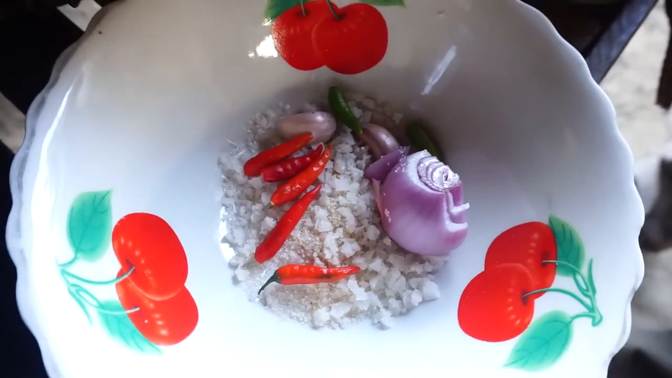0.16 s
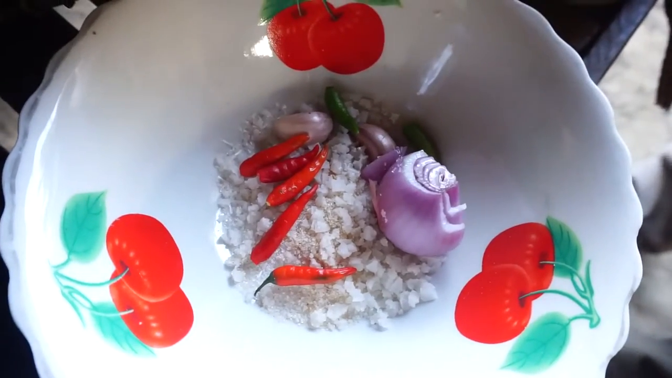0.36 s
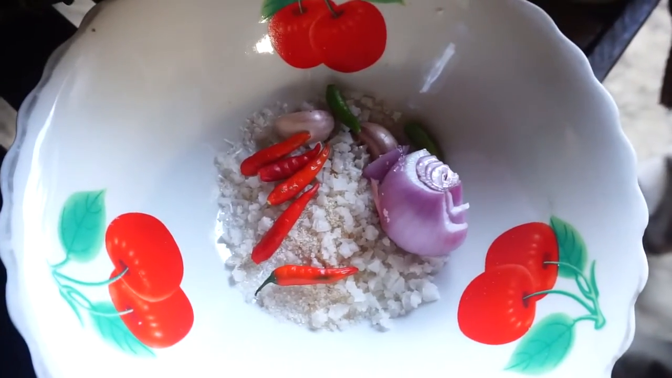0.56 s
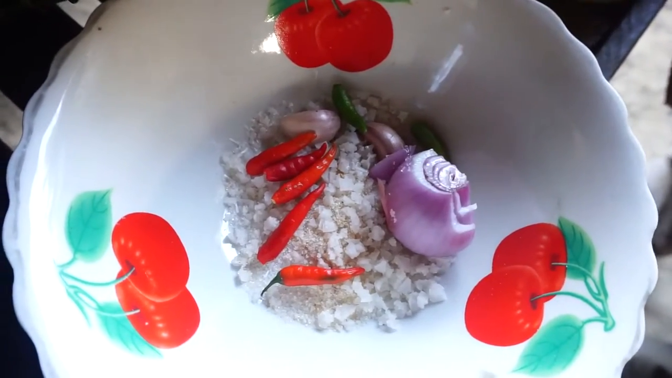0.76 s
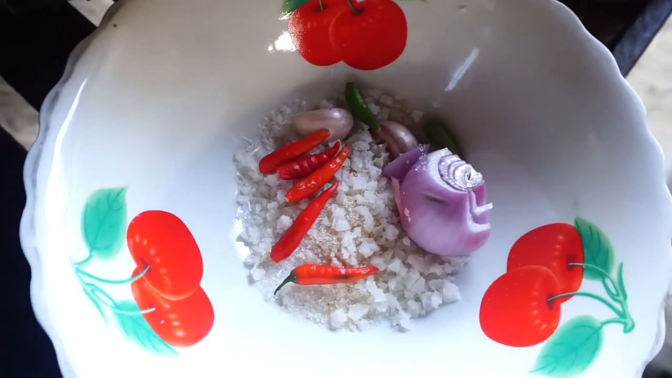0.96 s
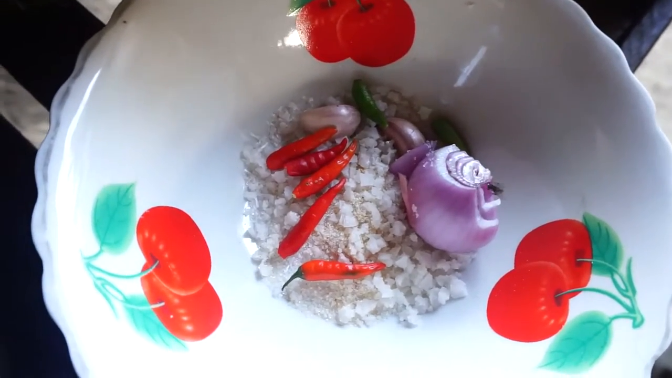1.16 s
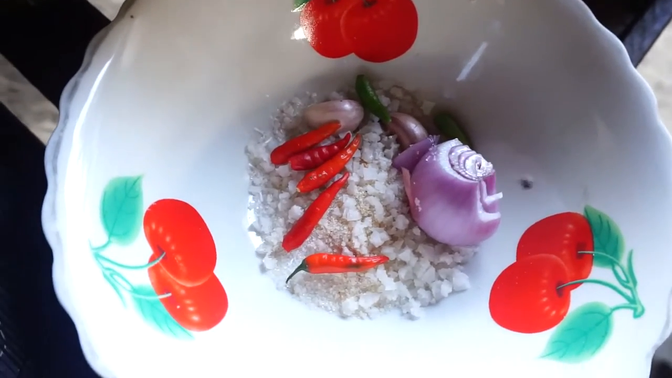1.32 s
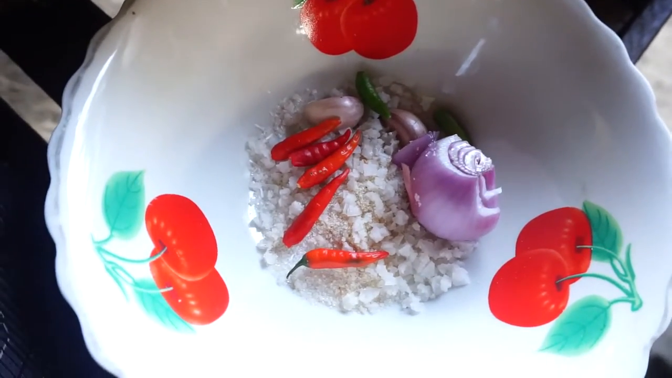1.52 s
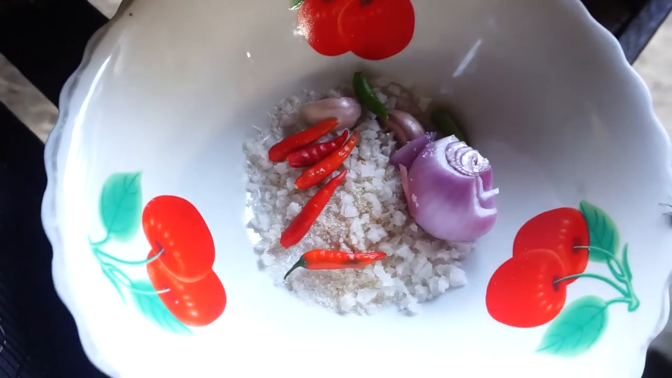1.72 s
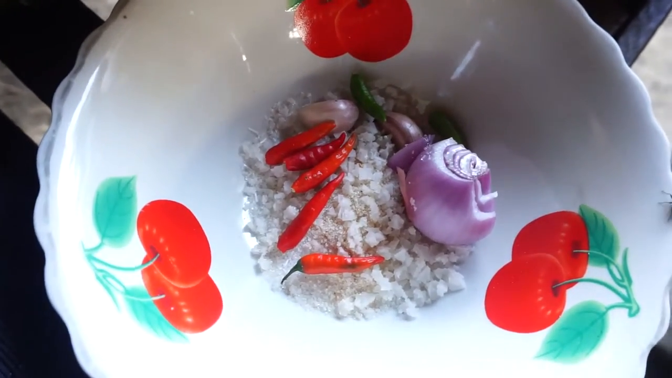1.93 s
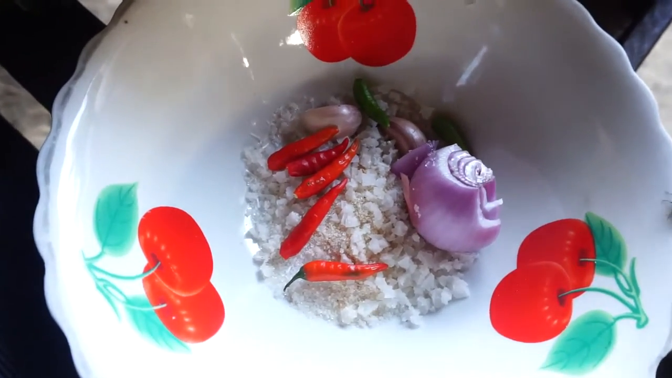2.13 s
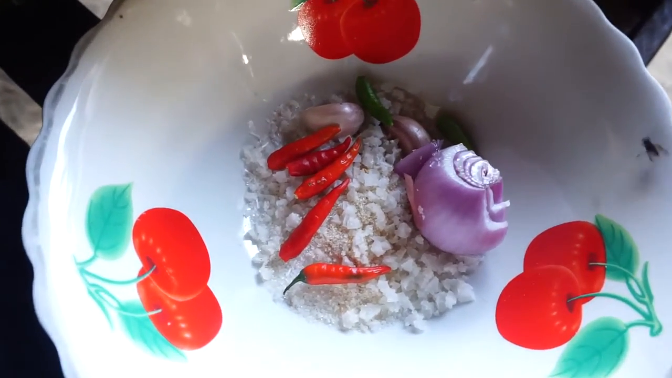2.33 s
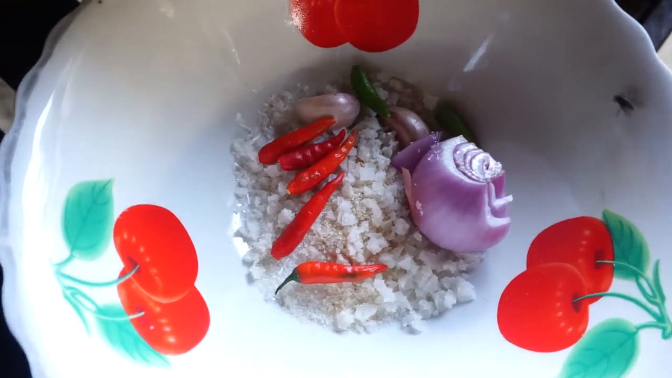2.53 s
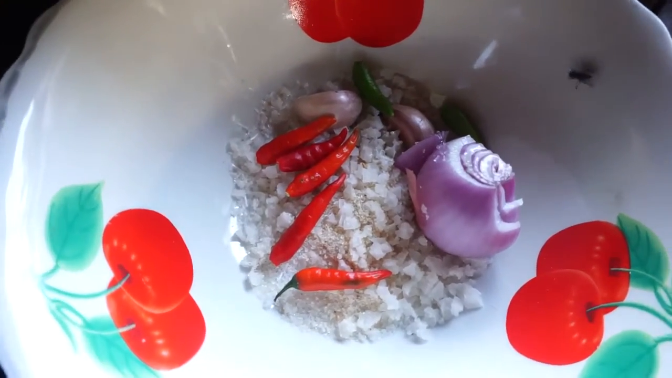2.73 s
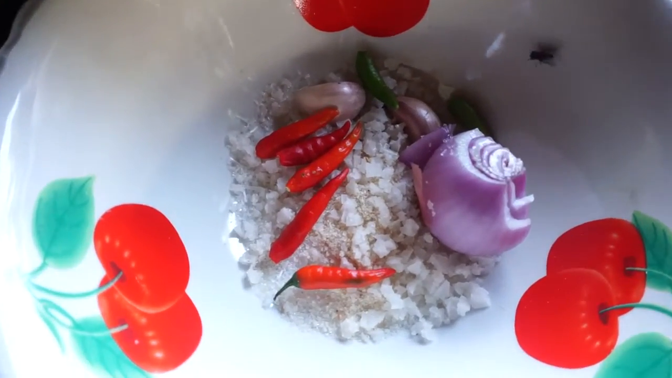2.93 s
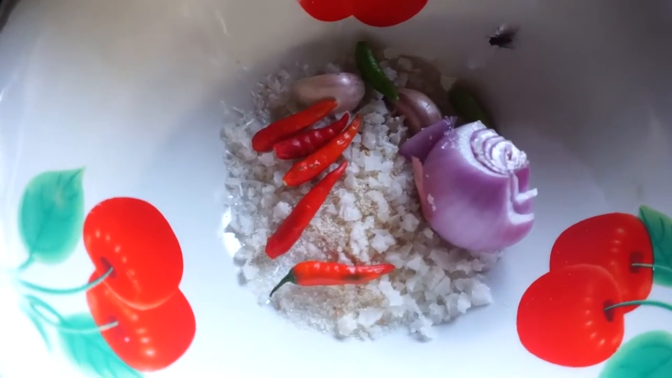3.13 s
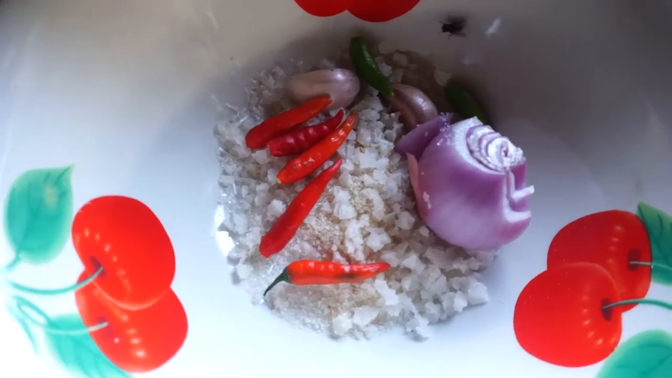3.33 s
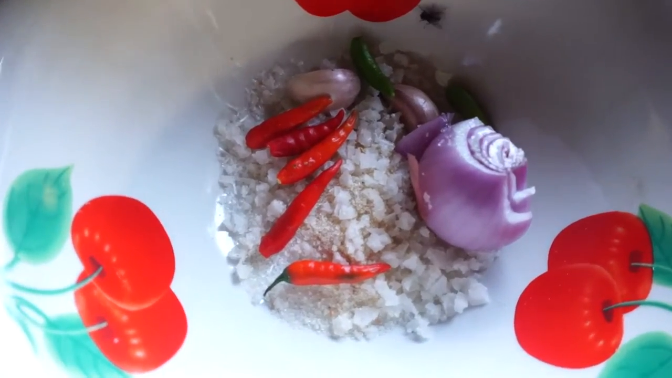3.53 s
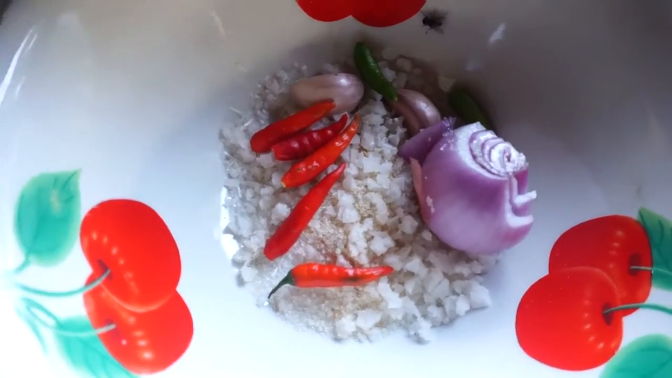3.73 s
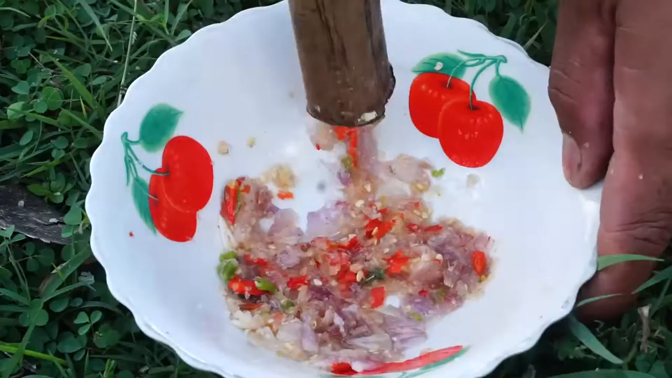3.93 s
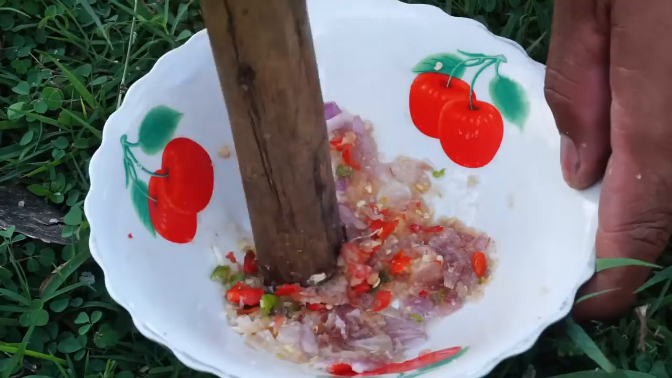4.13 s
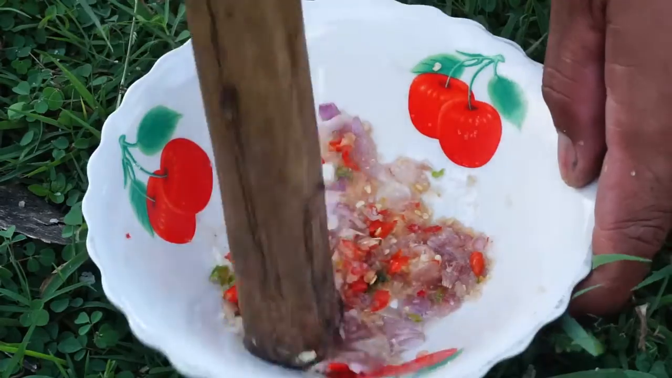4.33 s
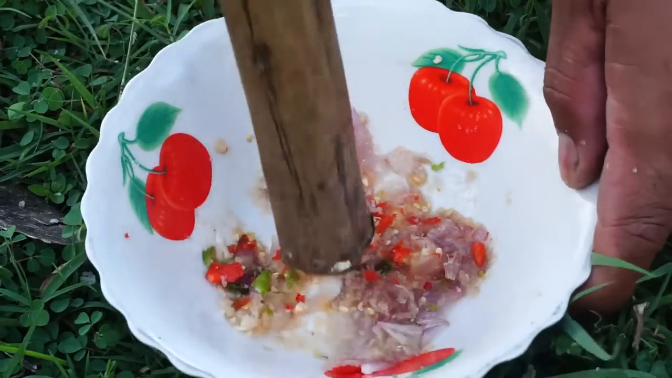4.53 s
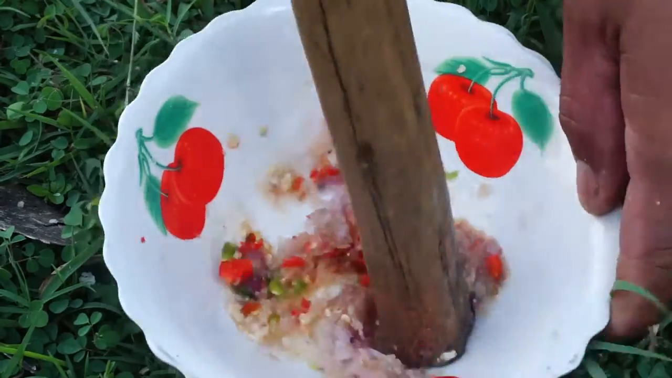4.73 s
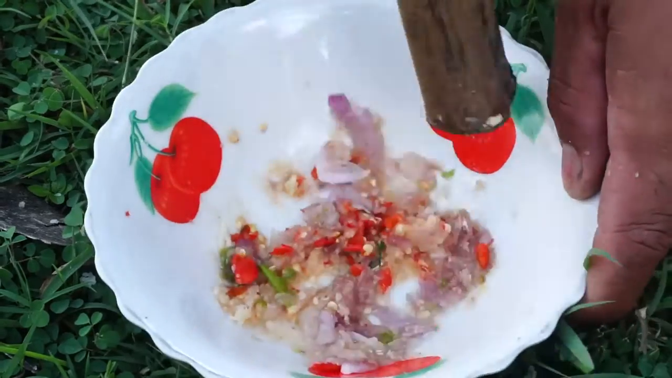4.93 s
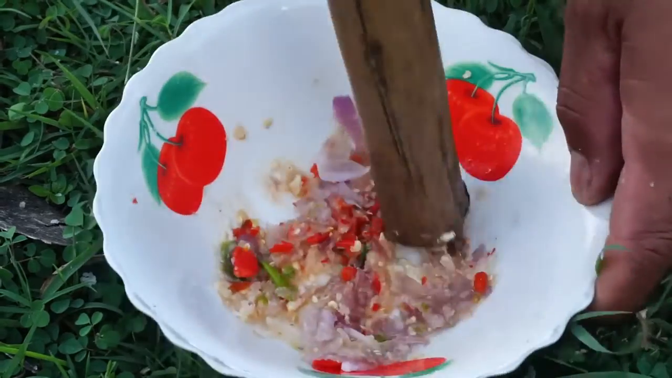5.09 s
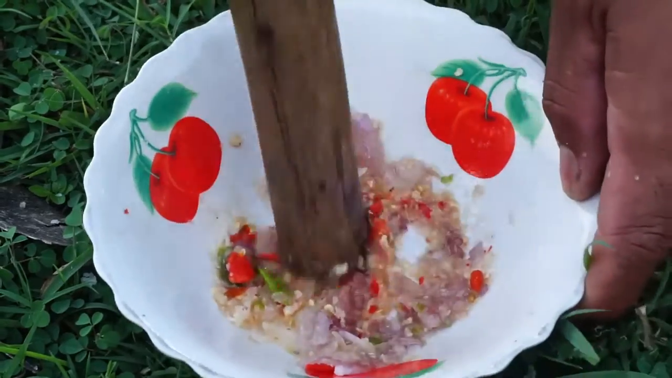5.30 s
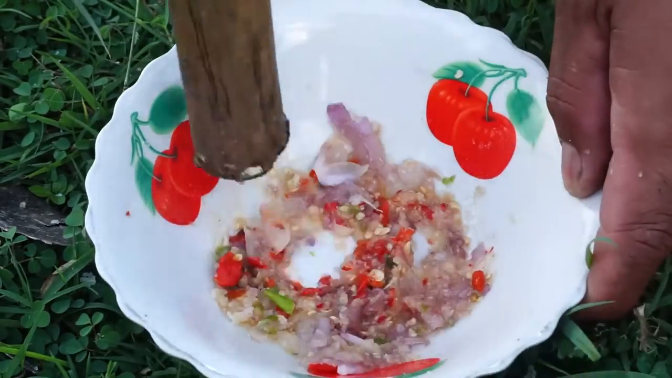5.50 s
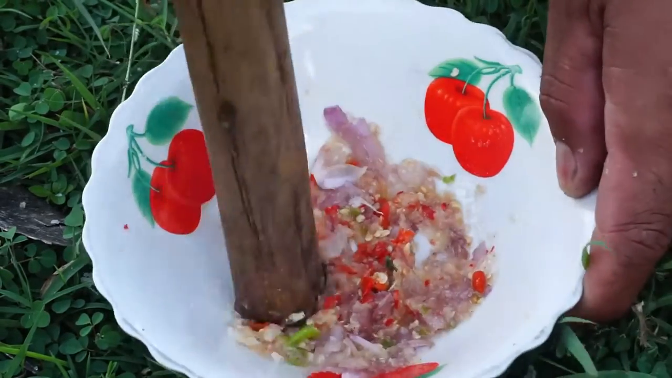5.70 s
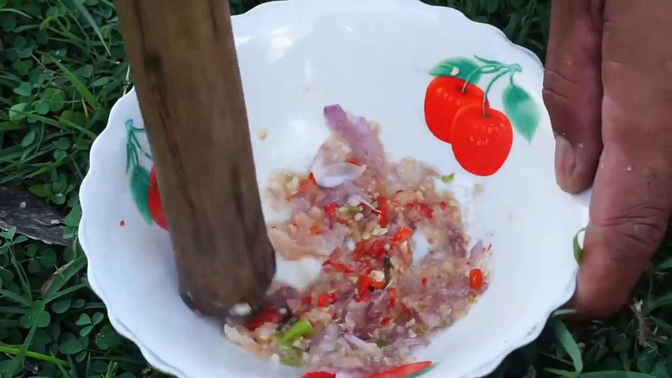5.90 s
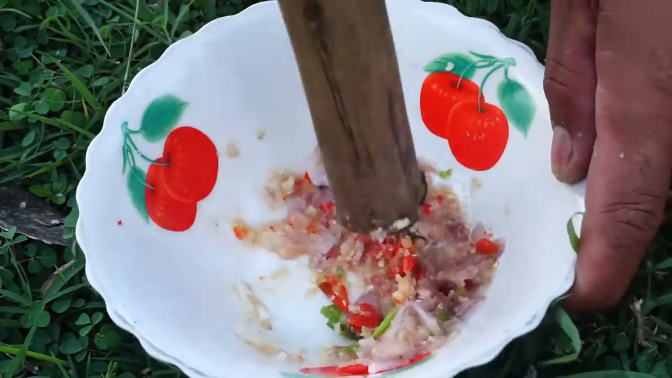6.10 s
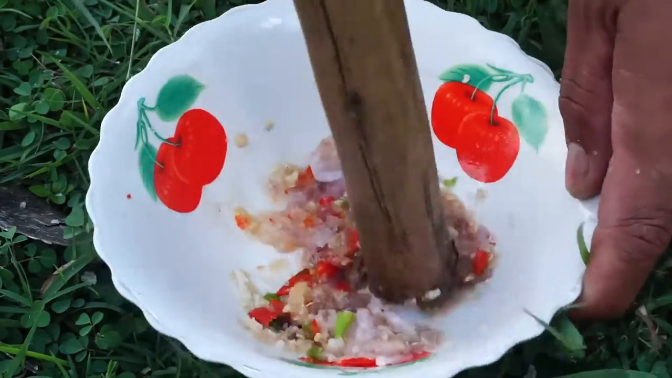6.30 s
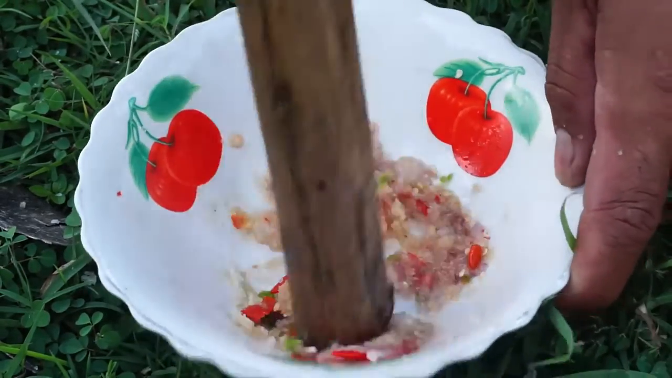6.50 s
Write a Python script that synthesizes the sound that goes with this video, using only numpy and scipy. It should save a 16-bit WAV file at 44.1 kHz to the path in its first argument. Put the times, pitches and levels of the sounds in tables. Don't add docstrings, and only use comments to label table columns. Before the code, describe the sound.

From 0 to 4 seconds a quiet yard is heard: soft low wind, thin leaf hiss and small cloth-like rustles, clearest around 1.3 seconds. A far bird gives very short, high gliding chirps from 0.5 seconds, with faint echoes off the surroundings. A weak fly buzz swells between 0.7 and 1.4 seconds and fades by 2. Tiny dry ticks are scattered throughout, with a bright metal clink at 1.5. Around 4.0 the sound drops almost to silence, then a lawn with barely audible crickets fades in. From 4.15 a wooden pestle pounds wet vegetables close by, roughly every 0.3 seconds, at about 4.15, 4.46, 4.8, 5.1, 5.4, 5.7, 6.0 and 6.3. Each much louder blow combines crisp pulp crunch, sharp seed snaps, short hollow bowl knocks and usually a low turf thump, heaviest near 5.4, followed by a soft crackling squelch on the lift.

```python
import sys
import numpy as np
from scipy import signal
from scipy.fft import rfft, irfft, next_fast_len
from scipy.io import wavfile
from scipy.ndimage import uniform_filter1d

SR = 44100
rng = np.random.default_rng(int(sys.argv[2]) if len(sys.argv) > 2 else 0)


def store_wav(level_fs):
    pcm = np.round(np.clip(np.atleast_2d(level_fs), -1, 1) * 32767)
    wavfile.write(sys.argv[1], SR, pcm.T.astype(np.int16))


def decibels_to_gain(level_db):
    exponent = np.asarray(level_db, float) / 20
    return 10 ** exponent


N = 288855
T = np.arange(N) / SR

# frequency in Hz, level in dB per Hz.
YARD_SPECTRUM = [(12, -34), (20, -15.5), (53, -2.5), (111, -10), (139, -11), (323, -15), (492, -15),
                 (839, -20), (1280, -22), (1790, -22), (2010, -23), (5830, -29), (14700, -31), (16500, -34)]
# frequency in Hz, level in dB per Hz.
LAWN_SPECTRUM = [(12, -26), (20, 2), (71, -8), (465, -20.5), (913, -23), (1280, -26.5), (1650, -26.5),
                 (2120, -28), (2310, -28.5), (3830, -31.5), (9670, -33.5), (11500, -27.5), (15200, -35),
                 (16500, -49)]
# frequency in Hz, left-right correlation.
LIKENESS = [(60, 1), (130, 0.74), (290, 0.0076), (640, -0.33), (1410, -0.28), (3100, -0.28), (6820, -0.093),
            (15000, 0.092)]
# time in seconds, level in dB.
YARD_STIR = [(0.0, -62.5), (0.56, -62.5), (0.9, -61), (1.06, -61), (1.32, -62), (1.47, -60.5), (1.62, -62),
             (2.36, -63), (3.0, -63), (3.65, -62), (3.83, -60.5), (3.94, -60.5)]
# time in seconds, level in dB.
LAWN_STIR = [(4.05, -66), (4.17, -62.5), (4.3, -66), (4.36, -65), (6.11, -65.5), (6.55, -65)]
AIR_HZ = (100, 1800, 8000, 13000)
STIR_SHARE = (0.02, 1.17, 2, 2)
# time in seconds, length in seconds, level in dB.
GUSTS = [
    (.53, .12, 4),
    (3.2, .25, 5),
    (3.95, .1, 3),
    (5.25, .12, 3),
]
# time in seconds, level in dB.
FADE = [
    (3.983, 0),
    (3.99, -20),
    (3.999, -42),
    (4.018, -46),
    (4.027, -21),
    (4.043, -8),
    (4.13, -4),
    (4.2, 0),
]
# centre in seconds, length in seconds, centre in Hz, level in dB.
RUSTLES = [(.25, .25, 13800, -63), (.8, 0.16, 1460, -66), (1.01, .2, 12000, -65), (1.33, 0.15, 12000, -58),
           (1.405, 0.4, 2900, -67), (1.4, .2, 1400, -68), (1.46, 0.29, 7940, -66),
           (1.867, 0.11, 6760, -62.5), (2.087, 0.3, 6100, -65.5), (2.39, 0.1, 2180, -64),
           (2.753, 0.23, 2000, -80), (3.775, 0.12, 13000, -61), (3.84, 0.065, 2200, -78),
           (3.957, 0.063, 2530, -63)]
# time in seconds, wing-beat octave in Hz, level in dB.
FLY = [
    (.45, 500, -88),
    (.7, 535, -71),
    (.9, 490, -71),
    (1.1, 545, -71),
    (1.4, 580, -73),
    (1.75, 570, -81),
    (2.0, 560, -95),
]
# start in seconds, last pitch in Hz, peak in dB.
RISING = [(0.652, 5900, -52.5), (0.981, 5920, -50), (1.851, 5900, -55.5), (2.069, 6010, -52),
          (2.411, 5840, -61.5), (2.782, 5840, -61), (3.3, 5850, -65), (3.797, 5830, -55),
          (3.955, 5840, -53.5)]
# start in seconds, first pitch in Hz, last pitch in Hz, length in ms, peak in dB.
SLIDING = [(.459, 5800, 5350, 15, -56), (.471, 5350, 4300, 13, -65), (.481, 4300, 3900, 26, -61),
           (.613, 4300, 4100, 14, -62), (.807, 5750, 5150, 16, -53), (.825, 4400, 3900, 20, -59),
           (1.116, 4350, 3150, 19, -56), (2.581, 6450, 6150, 16, -59), (2.4, 4300, 5300, 18, -66),
           (2.763, 4200, 5300, 24, -62), (3.757, 6200, 7100, 30, -63), (3.79, 4300, 5000, 12, -60),
           (3.925, 6300, 7300, 16, -62)]
# start in seconds, first pitch in Hz, last pitch in Hz, length in ms, peak in dB.
LAWN_NOTE = (4.035, 6700, 7150, 20, -66)
# start in seconds, peak in dB, centre in Hz, left minus right in dB.
TICKS = [(1.279, -50, 11800, -16), (1.3495, -39, 12600, -40.5), (1.3509, -69, 7050, -26),
         (1.513, -27.5, 11600, -14), (1.5134, -41, 4300, -12), (1.6, -45, 6510, -6),
         (1.6589, -34.5, 11700, -12), (1.729, -51, 2100, -2), (1.794, -49, 2000, -2),
         (1.979, -49, 2100, -2), (1.994, -52, 2050, -2), (2.018, -47, 1950, -2), (2.162, -52, 2050, 0.5),
         (2.281, -49.5, 2000, -2), (2.3425, -47, 1500, -2.5), (2.385, -45.5, 2520, 1),
         (2.401, -50, 2200, -2), (2.465, -48.5, 2200, -1), (2.528, -46, 10500, -6.5),
         (2.671, -48, 1900, -6), (2.62, -54, 7000, -6), (2.738, -48, 10400, -13), (2.803, -48.5, 1900, -3),
         (2.866, -54, 2000, -2), (3.1557, -57, 11700, 0.5), (3.329, -47.5, 9900, -12),
         (3.5937, -43, 2400, -11.5), (3.5933, -46, 4600, -12.5), (3.5935, -46, 10500, -10),
         (3.5945, -45, 3100, -8), (3.7, -51, 7500, -8), (3.63, -55, 12500, -8), (3.555, -55, 4500, -4),
         (3.7, -49, 11000, -9), (3.836, -44, 2070, -7), (3.9385, -43, 2400, -5), (3.9601, -34.5, 2500, -13),
         (3.9718, -38, 2400, 1), (3.98, -40, 1190, -6)]
# frequency in Hz, t60 in seconds.
METAL_MODES = [(11655, .14), (13482, .19), (6584, .22), (9604, .05)]
# start in seconds, peak of each of the four modes in dB, free ringing in seconds.
CLINKS = [
    (1.349, -60, -54, -44, -47, .004),
    (1.5138, -28, -32, -55, -56, .036),
    (1.6585, -51, -66, -75, -64, .012),
    (3.156, -54, -75, -80, -80, .06),
]
# time in seconds, left minus right in dB.
SPOT = [(4.15, -2), (4.456, -5), (4.476, 1), (4.53, -4.5), (4.8, -4), (5.13, -4.5), (5.42, -2), (5.72, -2),
        (6.02, -1.5), (6.32, -4.5)]
# start in seconds, peak in dB, frequency in Hz, squelch level in dB.
THUMPS = [
    (4.173, -23, 120, -46),
    (4.467, -40, 119, -43),
    (4.786, -48, 136, -68),
    (4.812, -25.5, 109, -42.5),
    (5.125, -23.5, 130, -44),
    (5.43, -17.5, 116.4, -47.5),
    (5.732, -21.5, 103, -44.5),
    (6.028, -23.5, 101, -40),
    (6.343, -23, 113, -43),
]
# start in seconds, peak in dB, lower mode in Hz, upper mode in Hz,
# upper minus lower in dB.
KNOCKS = [(4.1462, -25, 583, 980, 5), (4.151, -31.5, 567, 900, 1), (4.164, -36, 890, 960, 7),
          (4.1675, -27.5, 670, 1120, 14), (4.4568, -20, 678, 1093, 5), (4.476, -23.5, 620, 1026, 6.5),
          (4.7831, -16, 724, 860, -1.5), (4.7866, -19.5, 754, 870, -3), (4.7918, -31, 650, 910, -2),
          (4.804, -36, 700, 880, -3), (5.109, -36, 660, 1090, 21), (5.1153, -16.5, 636, 1023, 5.5),
          (5.417, -41, 526, 1100, 16), (5.4268, -18.5, 660, 800, -6), (5.707, -38, 804, 986, 16),
          (5.725, -28.5, 902, 990, -4), (5.729, -25, 868, 1077, 8.5), (5.994, -44, 816, 850, 0),
          (6.002, -42, 590, 930, 7), (6.017, -34, 880, 1145, 11), (6.022, -37, 860, 910, 15),
          (6.049, -48, 750, 1020, 10), (6.3122, -30, 570, 1000, 10.5), (6.3365, -18, 870, 1063, 6),
          (6.34, -30, 780, 1120, 3)]
# ratio to the lower mode, level in dB, share of t60.
LOWER = [(0.98, 0.5, 0.75), (1.153, -10, 1.1), (0.79, -1.5, 0.48), (0.423, -14.5, 1.13)]
# ratio to the upper mode, level in dB, share of t60.
UPPER = [(1.023, -3.5, 0.73), (1.24, -16, 0.16), (2.15, -16.5, 0.56), (1.43, -22, 0.4)]
# start in seconds, frequency in Hz, peak in
# dB, t60 in seconds.
PINGS = [(4.4568, 14200, -18.5, 0.033), (4.4576, 5900, -48, 0.034), (4.4568, 7900, -59, 0.043),
         (4.4568, 4260, -47, 0.038), (4.478, 9600, -34, 0.025), (4.478, 3800, -29.5, 0.017),
         (4.475, 5600, -30, 0.021), (4.7835, 14200, -40, 0.034), (4.807, 9670, -28, 0.044),
         (5.117, 9700, -34, 0.054), (5.425, 9280, -24.5, 0.014), (5.706, 12200, -19, 0.027),
         (5.706, 9900, -22, 0.025), (5.706, 14260, -28, .02), (5.73, 9500, -40, 0.017),
         (5.993, 9900, -39, 0.083), (6.019, 9900, -34, .016), (6.02, 4350, -26, 0.014),
         (6.312, 10350, -35, 0.018), (4.4577, 650, -19, .042), (4.48, 660, -33, .035),
         (6.34, 210, -34, .03), (5.426, 1800, -28, .012), (4.7838, 250, -25, .025),
         (4.808, 1750, -32, .025), (4.464, 680, -27, .05), (4.4775, 1750, -32, .02), (4.807, 380, -33, .02),
         (6.338, 330, -31, .03), (5.4255, 5300, -28, .012), (4.1475, 1400, -30, .012),
         (4.8075, 2350, -36, .02), (4.803, 8500, -28, .015), (4.4572, 1650, -25, .018),
         (4.784, 400, -27, .02), (5.426, 2350, -29, .015), (5.728, 680, -30, .025), (5.72, 1700, -34, .02),
         (4.1695, 700, -31, .03), (5.138, 480, -36, .02), (6.337, 1500, -33, .015),
         (4.458, 1935, -24.5, 0.023), (4.785, 1880, -30.5, 0.024), (5.427, 2080, -26.5, 0.0082)]
# start in seconds, peak in dB, centre in Hz.
SNAPS = [(4.1467, -24, 11500), (4.1605, -22, 10500), (4.219, -42, 9000), (4.4572, -22, 12500),
         (4.4773, -30, 13000), (4.5306, -25, 7950), (4.8028, -17.5, 13000), (4.8245, -45, 12000),
         (4.8318, -36, 9000), (4.8347, -30, 8000), (4.9705, -46, 9000), (5.1368, -21, 11000),
         (5.151, -40, 10500), (5.1622, -32, 11500), (5.1667, -25, 8000), (5.426, -20, 10500),
         (5.4905, -50, 9000), (5.5135, -43, 9000), (5.536, -53, 9000), (5.7068, -19, 11500),
         (5.7223, -23, 12500), (5.7287, -21, 12000), (5.7538, -38, 10500), (5.774, -48, 9000),
         (5.7985, -43, 9000), (6.0505, -18, 10000), (6.3125, -28, 10500), (6.333, -20.5, 12000),
         (6.367, -40, 12000)]
# start in seconds, level in dB, hold in ms, dull part under 5 kHz in dB.
CRUNCHES = [(4.145, -44, 2, 3), (4.147, -39, 1.5, 2), (4.151, -48, 6.7, 6), (4.1597, -26, 5.7, -8),
            (4.1675, -29.5, 2, 2.5), (4.17, -34, 2.5, 2.5), (4.456, -36, .7, 6), (4.4655, -39, 3.6, 5),
            (4.47, -35.5, 5.3, 4.5), (4.477, -30, 1, -3), (4.478, -33, 1.6, 3.5), (4.7835, -40, 1.8, 8),
            (4.793, -52, 5, 2), (4.799, -43, 3, -1), (4.804, -26.5, 3.5, -1.5), (4.8073, -28.5, 3.6, 1.5),
            (5.103, -43, 2, -3), (5.1074, -25, 3.9, -7), (5.111, -35.5, 2.7, 5.5), (5.1157, -31.5, 2, 0),
            (5.119, -39, 6.9, 3), (5.137, -33, 2.3, 1), (5.4105, -39.5, 3.5, -2), (5.416, -35, 5.7, 0),
            (5.4247, -25.5, 1.7, -0.5), (5.427, -33.5, 1.3, 2), (5.7058, -22.5, 2.5, -7.5),
            (5.711, -29, 3, -4), (5.718, -32, 2, -1), (5.7206, -24, 2, -4.5), (5.724, -30, 4, 1.5),
            (5.7295, -29, 4.4, 2), (5.752, -42.5, 3, 3), (5.9935, -38.5, 1.8, -0.5), (5.997, -44, 6, 4),
            (6.003, -36.5, 2.3, 2), (6.009, -43, 6, 2), (6.015, -32, 2, -2), (6.0187, -19, 2.6, -5.5),
            (6.023, -25, 2.8, -3), (6.028, -40, 9.5, -2.5), (6.04, -39, 10, 0), (6.052, -38, 5, -1.5),
            (6.311, -31, 3, 1.5), (6.315, -42, 4, 5), (6.321, -45, 7, 5), (6.329, -38, 2.5, 1),
            (6.3315, -33, 3.5, -3), (6.337, -30, 1.6, 1.5), (6.3393, -36.5, 5.7, 4.5)]
# frequency in Hz, level in dB per Hz.
PULP_SPECTRUM = [(410, -8), (700, -6.5), (2410, -9), (3150, -10.5), (5720, -8), (7370, -9.5), (9870, -3.5),
                 (11300, -2), (12200, -3.5), (15900, -3), (16800, -49)]
# frequency in Hz, width in Hz, level in dB.
RIM_MODES = [(3800, 120, -3), (5660, 410, -17), (8350, 140, -44), (9700, 79, -10), (10500, 150, -24),
             (12200, 150, -19), (14260, 88, -15)]


def curve(table, at_hz):
    hz, value = np.transpose(table)
    return np.interp(np.log(np.maximum(at_hz, 1)), np.log(hz), value)


def shape(x, gain):
    size = next_fast_len(N)
    f = np.arange(size // 2 + 1) * SR / size
    return irfft(rfft(x, size) * gain(f), size)[..., :N]


def resonate(x, hz, q):
    return signal.lfilter(*signal.iirpeak(hz, q, SR), x)


def bell(centre, width):
    return lambda f: np.exp(-.5 * ((f - centre) / width) ** 2)


def low_cut(f, hz):
    return 1 / (1 + (hz / (f + 1)) ** 4)


def unit(x):
    return x / np.sqrt(np.mean(x ** 2))


def walk(rate_hz):
    k = int(SR / rate_hz)
    held = np.repeat(rng.standard_normal(N // k + 1), k)
    return uniform_filter1d(uniform_filter1d(held, k), k)[:N]


def pan(left_db):
    return decibels_to_gain(np.array([[left_db], [-left_db]]) / 2)


def add(out, s, x, pan_db):
    i = int(s * SR)
    out[:, i:i + len(x)] += (pan(pan_db) * x)[:, :N - i]


def blow_pan_db(s):
    return np.interp(s, *np.transpose(SPOT))


def ring(hz, t60_s, attack_s, order=1):
    t = np.arange(int(.15 * SR)) / SR
    decay = decibels_to_gain(-60 * t / max(t60_s, .006))
    build = (1 - np.exp(-t / max(attack_s, 1e-5))) ** order
    return -np.sin(2 * np.pi * hz * t) * decay * build


def hiss_burst(hiss, decay_s, hz, q):
    burst = resonate(hiss * np.exp(-T[:len(hiss)] / decay_s), hz, q)
    return burst / np.abs(burst).max()


def grains(scatter_db, apart):
    mid, side = rng.standard_normal((2, N))
    cell_size = np.minimum(rng.exponential(size=N // 12 + 1), 3.5)
    size = decibels_to_gain(scatter_db * np.repeat(cell_size, 12)[:N])
    return unit(size * np.array([mid + apart * side, mid - apart * side]))


def air(spectrum, levels, left_db):
    s, stir_db = np.transpose(levels)
    stir = np.interp(T, s, stir_db - np.median(stir_db))
    gust = 1.1 * walk(4.1) + sum(db * bell(at, length / 2)(T) for at, length, db in GUSTS)
    size = next_fast_len(N)
    noise = rfft(rng.standard_normal((2, size)))
    f = np.arange(size // 2 + 1) * SR / size
    out = 0
    for hz in 22 * 2 ** np.arange(0, 9.6, .5):
        band = decibels_to_gain(curve(spectrum, f)) * bell(np.log(hz), .2)(np.log(f + 1))
        mid, side = irfft(noise * band, size)[:, :N]
        share = np.interp(np.log(hz), np.log(AIR_HZ), STIR_SHARE)
        gain = decibels_to_gain(share * stir + gust / (1 + (hz / 250) ** 2) + 1.2 * walk(9))
        like = np.clip(curve(LIKENESS, hz), -.95, .95)
        apart = np.sqrt(1 - like) * side * np.array([[1], [-1]])
        out = out + gain * (np.sqrt(1 + like) * mid + apart)
    return unit(out) * pan(left_db)


def crickets():
    chorus = shape(rng.standard_normal((2, N)), bell(11500, 380))
    return decibels_to_gain(-78 + 3.3 * walk(12)) * unit(chorus)


def rustle():
    cells = grains(3.5, .8) * decibels_to_gain(5 * walk(60))
    out = np.zeros((2, N))
    for s, length_s, hz, db in RUSTLES:
        i, k = int((s - length_s) * SR), int(2 * length_s * SR)
        band = resonate(cells[:, i:i + k], hz, 2.2)
        out[:, i:i + k] += decibels_to_gain(db) * np.hanning(k) * unit(band) * pan(-3)
    return out


def fly():
    s, octave_hz, db = np.transpose(FLY)
    phase = np.pi * np.cumsum(np.interp(T, s, octave_hz) * (1 + .09 * walk(40))) / SR
    size = decibels_to_gain(np.interp(T, s, db, -120, -120) + 3 * walk(18))
    return size * (.6 * np.sin(phase) + 1.4 * np.sin(2 * phase)) * pan(-5)


def whistle(hz, db):
    glide_loss_db = 3.5
    speed = np.abs(np.gradient(hz))
    swell = np.hanning(len(hz)) ** .25 * decibels_to_gain(db - glide_loss_db * speed / speed.max())
    return swell * np.sin(2 * np.pi * np.cumsum(hz) / SR)


def rising_note(last_hz, db):
    rise_ms, total_rises = 16, 1.55
    u = np.linspace(0, total_rises, int(total_rises * rise_ms * SR / 1000))
    return whistle(last_hz * (1 - .2 * np.maximum(1 - u, 0) ** 1.6), db)


def sliding_note(first_hz, last_hz, ms, db):
    u = np.linspace(0, np.pi, int(ms * SR / 1000))
    return whistle(last_hz + (first_hz - last_hz) * (1 + np.cos(u)) / 2, db)


def bird():
    up, sliding = np.zeros((2, 2, N))
    for s, last_hz, db in RISING:
        add(up, s, rising_note(last_hz, db), -5)
    for s, *note in SLIDING:
        add(sliding, s, sliding_note(*note), -5)
    echo_db, echo_t60_s, echo_end_s, first_echo_s = -33, 1.4, .17, .015
    t = T[:int(.3 * SR)]
    decay_db = -60 * t / echo_t60_s - 14 * (t / echo_end_s) ** 3
    echoes = rng.standard_normal((2, len(t))) * decibels_to_gain(2.5 * walk(45)[:len(t)] + decay_db)
    echoes *= t > first_echo_s
    wet = signal.fftconvolve(up + decibels_to_gain(-4.5) * sliding, echoes, axes=1)[:, :N]
    return decibels_to_gain(-3.5) * (up + sliding) + decibels_to_gain(echo_db) * wet


def ticks():
    out = np.zeros((2, N))
    for s, db, hz, pan_db in TICKS:
        click = hiss_burst(rng.standard_normal(600), .0022, hz, 3)
        add(out, s, decibels_to_gain(db - 3.5) * click, pan_db)
    return out


def clinks():
    out = np.zeros((2, N))
    t = T[:int(.15 * SR)]
    for s, *mode_db, free_s in CLINKS:
        touch = decibels_to_gain(-1500 * np.maximum(t - free_s, 0))
        for db, (hz, t60_s) in zip(mode_db, METAL_MODES):
            add(out, s, touch * decibels_to_gain(db) * ring(hz, t60_s, .00055), -14)
    return out


def turf():
    out = np.zeros((2, N))
    for s, db, hz, _ in THUMPS:
        t60_s = 6 / hz
        bounce = ring(hz, t60_s, .0028)
        bounce += .057 * ring(hz * .63, t60_s * 2, .026)
        bounce += .254 * ring(hz * 1.9, t60_s * .76, .0047)
        add(out, s, decibels_to_gain(db) * bounce, 0)
    return out


def bowl():
    out = np.zeros((2, N))
    for s, db, lower_hz, upper_hz, lean_db in KNOCKS:
        t60_s = .029 * decibels_to_gain(-.24 * (db + 27.5))
        for hz, family, side in ((lower_hz, LOWER, -1), (upper_hz, UPPER, 1)):
            for ratio, mode_db, share in family:
                level = decibels_to_gain(db + 4 + mode_db + side * lean_db / 2)
                mode = ring(hz * ratio, t60_s * share, .0007, order=2)
                add(out, s + .00029, level * mode, blow_pan_db(s) / 2)
    for s, hz, db, t60_s in PINGS:
        add(out, s, decibels_to_gain(db) * ring(hz, t60_s, .00034), blow_pan_db(s))
    return out


def snaps():
    out = np.zeros((2, N))
    for s, db, hz in SNAPS:
        crack = hiss_burst(rng.standard_normal(400), .00092, hz, 1.4)
        add(out, s, decibels_to_gain(db) * crack, blow_pan_db(s))
    return shape(out, lambda f: low_cut(f, 2580))


def crush():
    crisp, dull = np.zeros((2, 2, N))
    ms = np.arange(-30 * SR // 1000, 80 * SR // 1000) * 1000 / SR
    for s, db, hold_ms, dull_db in CRUNCHES:
        rise_ms = .56 + .26 * hold_ms
        fall_ms = 5.2 * decibels_to_gain(1.06 * dull_db)
        rise_db = 20 * np.minimum(ms / max(rise_ms, .2), 0)
        fall_db = 20 * np.maximum(ms - hold_ms, 0) / max(fall_ms, .5)
        env_db = db + rise_db - fall_db
        start_s = s + ms[0] / 1000
        add(crisp, start_s, decibels_to_gain(env_db), blow_pan_db(s))
        add(dull, start_s, decibels_to_gain(env_db + dull_db), blow_pan_db(s) / 2)
    return crisp, dull


def squelch():
    swell_ms, fall_ms = 12.5, 143
    lift = np.zeros((2, N))
    ms = T[:SR // 2] * 1000
    for s, _, _, db in THUMPS:
        add(lift, s, decibels_to_gain(db - 20 * ms / fall_ms) * (1 - np.exp(-ms / swell_ms)), -1.5)
    return lift * decibels_to_gain(2.5 * walk(70)) * grains(4.7, .83)


def pulp():
    crisp, dull = crush()
    cells, suck = grains(1.8, .59), squelch()
    colour = lambda f: decibels_to_gain(curve(PULP_SPECTRUM, f))
    upper = lambda f: low_cut(f, 5000)
    broad = shape(crisp * cells + suck, lambda f: colour(f) * upper(f))
    broad += shape(dull * cells + decibels_to_gain(2.5) * suck, lambda f: colour(f) * (1 - upper(f)))
    broad /= np.sqrt(np.mean(colour(np.linspace(0, SR / 2, 500)) ** 2))
    rim = sum(decibels_to_gain(db) * resonate(broad, hz, hz / width_hz) for hz, width_hz, db in RIM_MODES)
    return decibels_to_gain(-3) * broad + rim


def scene():
    cut_s = 4.018
    yard = decibels_to_gain(-55.5) * air(YARD_SPECTRUM, YARD_STIR, -1.1)
    yard += rustle() + fly() + bird() + ticks() + clinks()
    lawn = decibels_to_gain(-54.5) * air(LAWN_SPECTRUM, LAWN_STIR, -.32) + crickets()
    add(lawn, LAWN_NOTE[0], sliding_note(*LAWN_NOTE[1:]), 0)
    background = decibels_to_gain(np.interp(T, *np.transpose(FADE))) * np.where(T < cut_s, yard, lawn)
    hollow = lambda f: 1 - .35 * bell(1440, 100)(f)
    return background + shape(turf() + bowl() + pulp(), hollow) + snaps()


def roll_off(x):
    return signal.sosfilt(signal.butter(12, 16980, fs=SR, output="sos"), x)


def record(dry):
    top_hz, low_hz = 15800, 42
    treble = lambda f: decibels_to_gain(-32 * np.clip((f - top_hz) / 150, 0, 1))
    mix = shape(dry, lambda f: treble(f) * np.sqrt(low_cut(f, low_hz)))
    return roll_off(mix)


dry = scene()
out = record(dry)
store_wav(out)
```